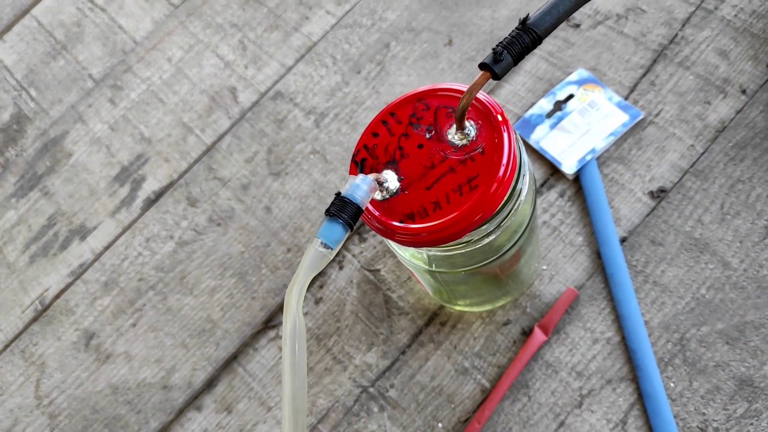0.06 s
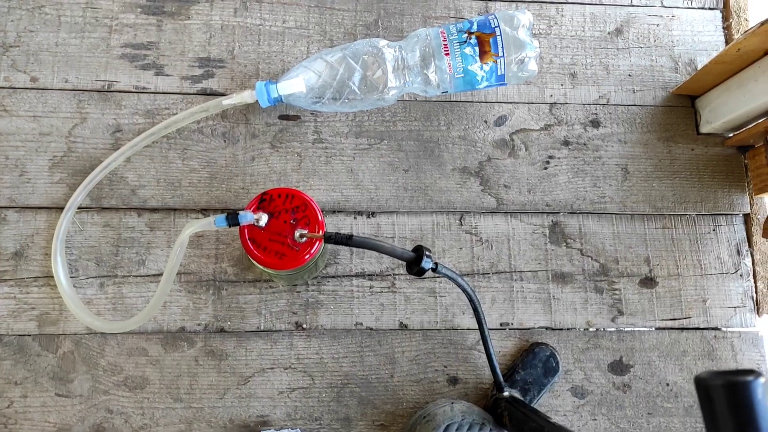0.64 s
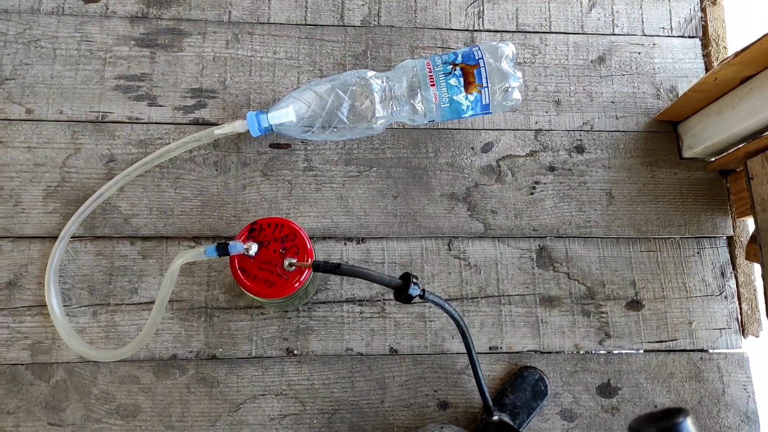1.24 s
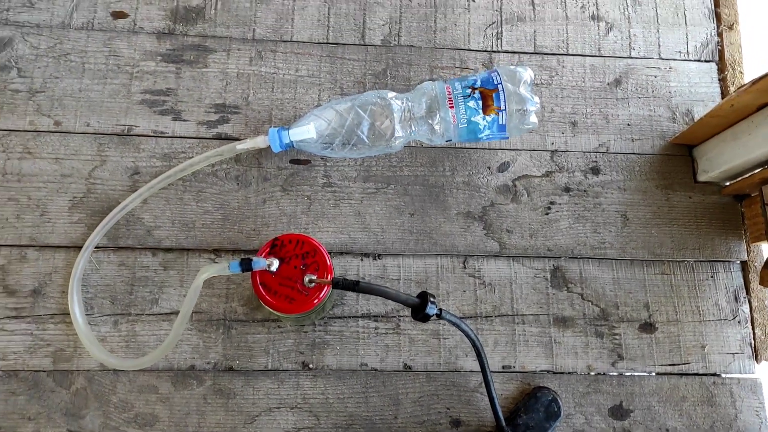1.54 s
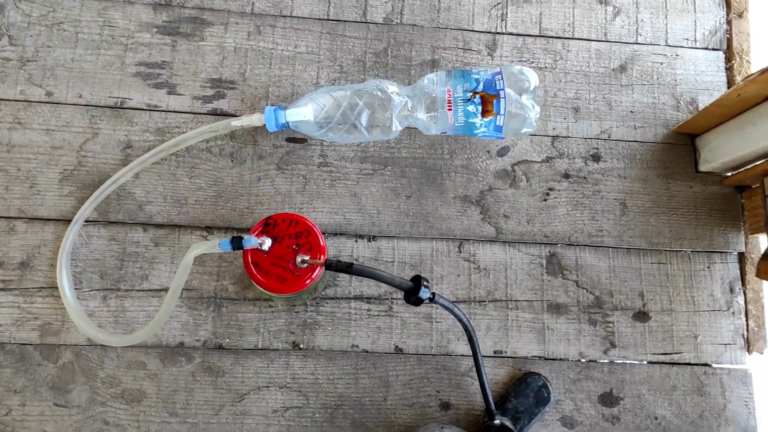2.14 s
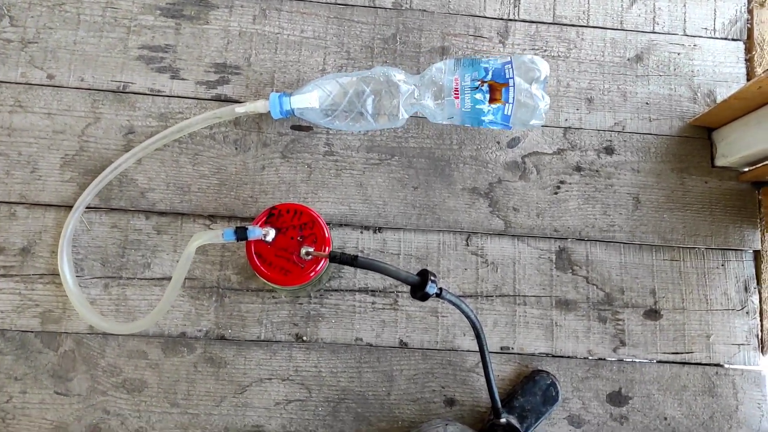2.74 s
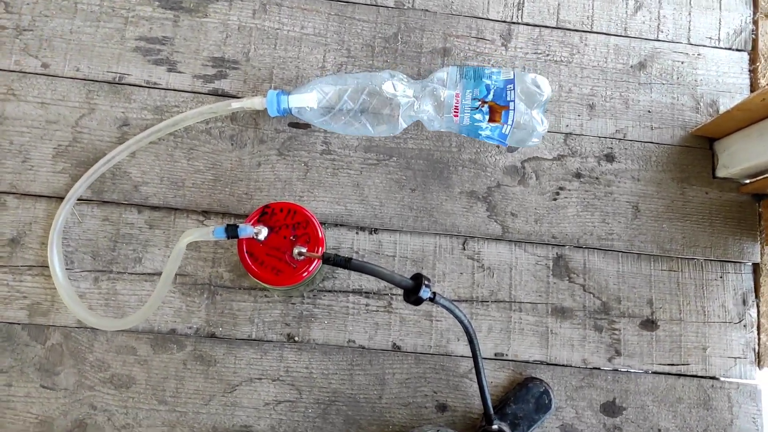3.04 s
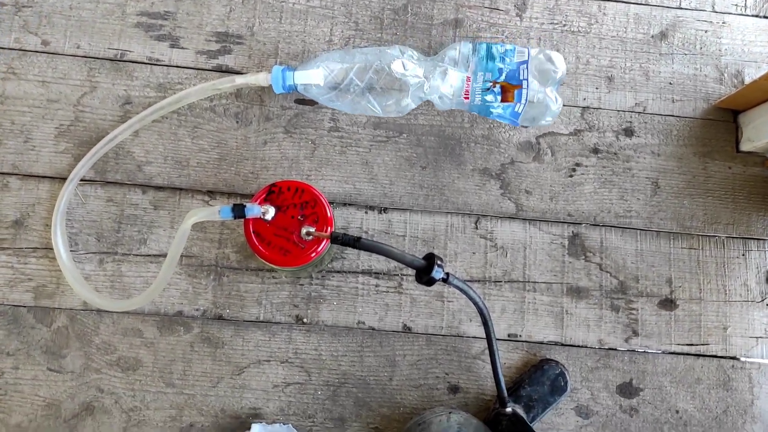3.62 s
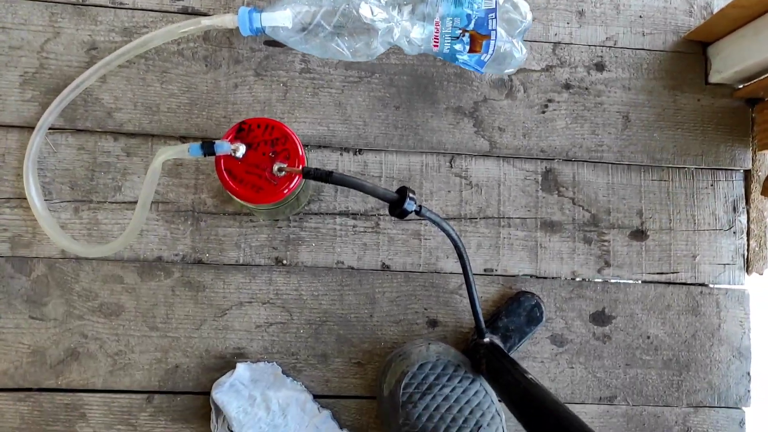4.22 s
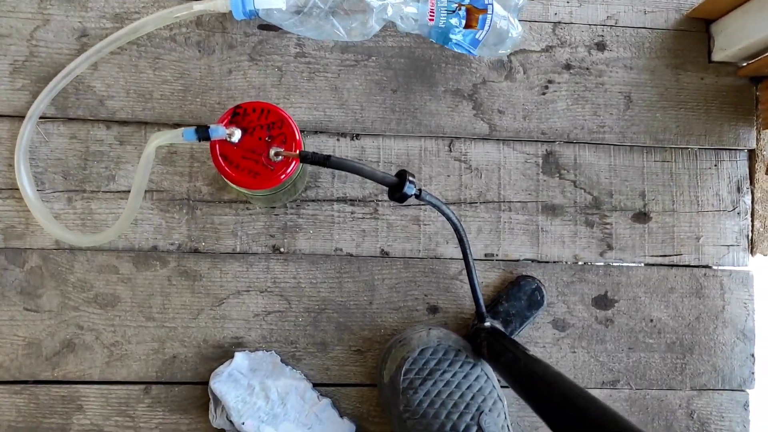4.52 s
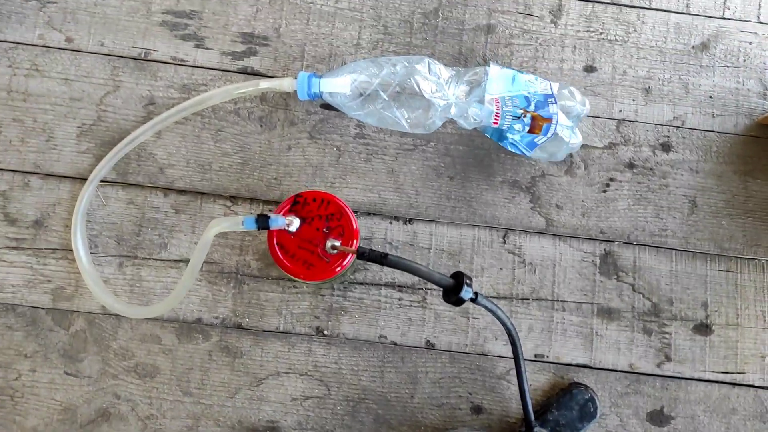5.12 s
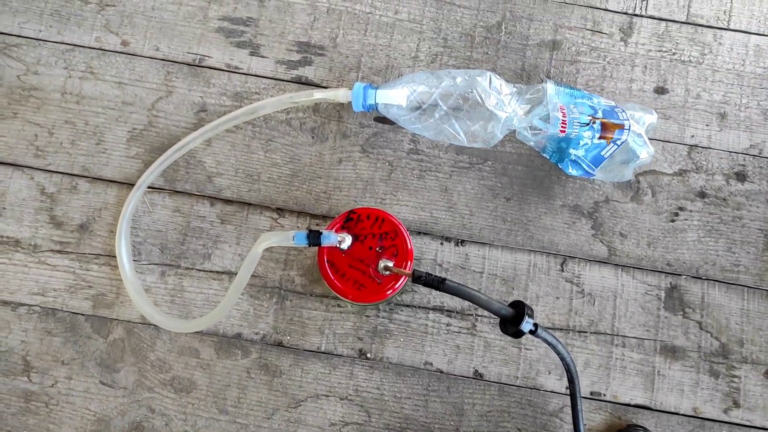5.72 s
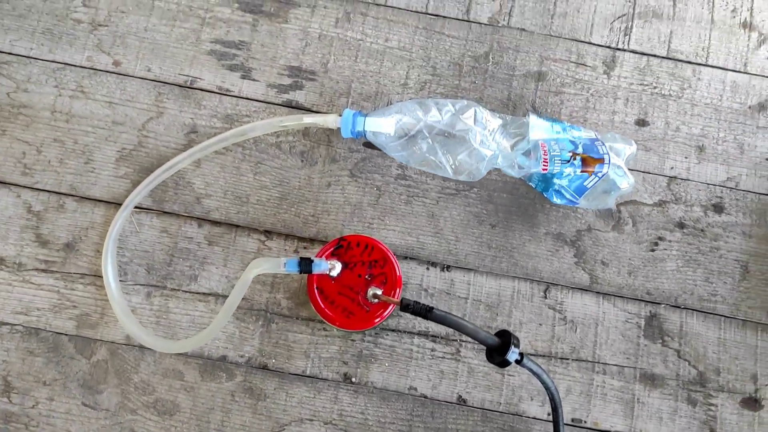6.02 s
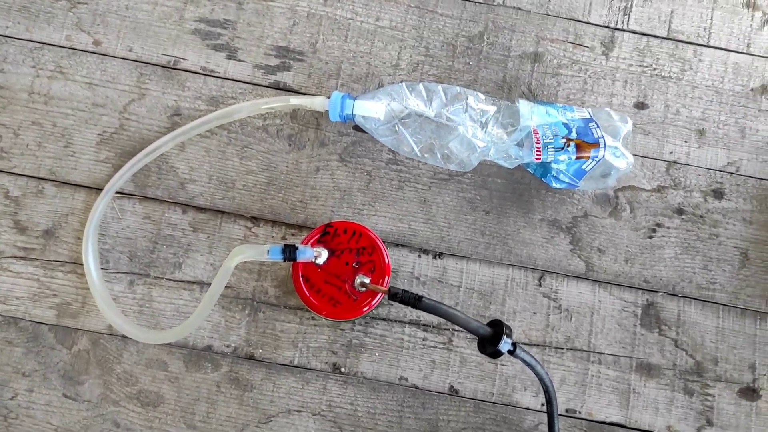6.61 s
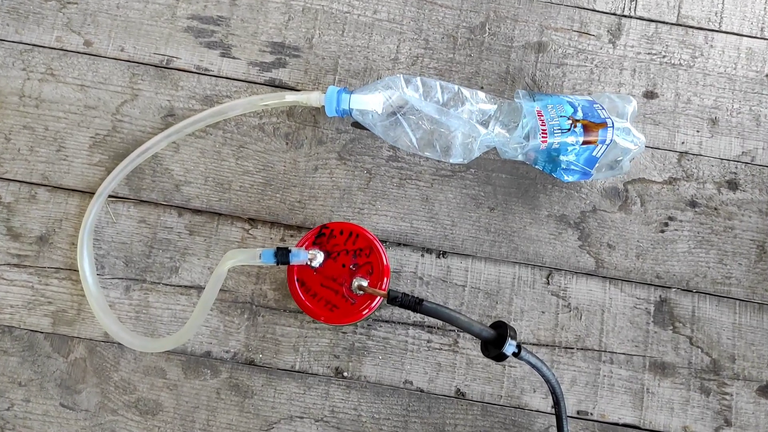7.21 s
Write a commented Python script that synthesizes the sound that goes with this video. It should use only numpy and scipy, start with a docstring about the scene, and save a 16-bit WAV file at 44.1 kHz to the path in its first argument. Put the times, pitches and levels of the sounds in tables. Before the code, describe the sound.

Hand pump strokes hiss and rub in a small workshop while an emptying plastic bottle buckles with loud, hollow cracks.

```python
"""A small workshop with a wooden floor: a foot-worked vacuum pump empties a thin plastic bottle. Faint whistles
come first. Air hisses, the piston rubs, the barrel rings, the seal squeaks once and the boards knock. The wall
buckles in volleys of pops: a crack, then the ring of the panel and a hollow thump. Heard close through two
resonant microphone ports; the loudest pops overload."""
import sys
import numpy as np
from scipy import signal
from scipy.fft import rfft, irfft, next_fast_len
from scipy.io import wavfile
from scipy.ndimage import uniform_filter1d, map_coordinates

SR = 44100
rng = np.random.default_rng(int(sys.argv[2]) if len(sys.argv) > 2 else 0)


def int16_out(signal):
    """Quantize to a 16-bit WAV file."""
    q = np.round(np.clip(np.atleast_2d(signal).T, -1, 1) * 32767)
    wavfile.write(sys.argv[1], SR, q.astype(np.int16))


N = 320166
SCENE_S = np.arange(N) / SR
EVENT_S = np.arange(SR // 2) / SR  # time within one pop or knock


def amp(db):
    """Decibels to gain."""
    return 10 ** (np.asarray(db) / 20)


def unit(x):
    """Scale to rms 1."""
    return x / np.sqrt(np.mean(x ** 2) + 1e-20)


def burst(x):
    """Scale to the energy of 10 ms at rms 1."""
    return unit(x) * np.sqrt(.01 * SR / x.shape[-1])


def along(points, hz):
    """Interpolate (freq_hz, value) points on a log axis."""
    freqs_hz, values = np.transpose(points)
    return np.interp(np.log(hz + 1), np.log(freqs_hz + 1), values)


def add(track, start_s, x):
    """Mix x into the track."""
    start = max(round(start_s * SR), 0)
    track[:, start:start + x.shape[-1]] += x[..., :N - start]


def band(x, low_hz, high_hz, order=3):
    """Causal band-pass."""
    sos = signal.butter(order, [low_hz, min(high_hz, SR / 2 - 1)], "band", fs=SR, output="sos")
    return signal.sosfilt(sos, x)


def swell(middle_s, length_s):
    """Half-cosine rise and fall, height 1."""
    return np.cos(np.pi * np.clip((SCENE_S - middle_s) / length_s, -.5, .5))


# Left-right likeness of diffuse sound: freq_hz, correlation
COHERENCE = [(100, 0.88), (400, 0.82), (950, 0.6), (2200, 0), (15000, 0)]
def diffuse(size, spectrum=((1, 0),)):
    """Stereo noise of rms 1, alike in the bass, unrelated in the treble."""
    hz = np.fft.rfftfreq(size, 1 / SR)
    angle = np.arccos(np.clip(along(COHERENCE, hz), -1, 1)) / 2
    bins = rfft(rng.standard_normal((2, size))) * amp(along(spectrum, hz))
    mid, side = irfft(bins * [np.cos(angle), np.sin(angle)], size)
    return unit(np.array([mid + side, mid - side]))


def rush(spectrum, patchy_db):
    """Noise whose colour shifts in patches."""
    bins = signal.stft(diffuse(next_fast_len(N), spectrum), nperseg=512)[2]
    patches = uniform_filter1d(rng.standard_normal(bins.shape[1:]), size=3, axis=0)
    patches = unit(uniform_filter1d(patches, size=10, axis=1))
    return unit(signal.istft(bins * amp(patchy_db * patches), nperseg=512)[1][:, :N])


# Background spectrum: freq_hz, relative_db
ROOM_TONE_SPECTRUM = [(15, -38), (25, 11.5), (150, -2.5), (231, 0), (588, -9), (673, -6.5), (1120, -10.5),
                      (1280, -15.5), (7680, -16.5), (15000, -48)]
def room_tone():
    """The workshop's faint, low background."""
    return amp(-58) * rush(ROOM_TONE_SPECTRUM, patchy_db=2)


# Thin whistles: middle_s, length_s, first_hz, last_hz, relative_db
WHISTLE_GLIDES = [(0.142, 0.034, 4850, 4540, -61.5), (0.2, .09, 3000, 3730, -64),
                  (.635, .06, 6000, 5750, -76), (0.703, 0.085, 4900, 4100, -63),
                  (0.748, 0.11, 3450, 2420, -63)]
def whistles():
    """Faint, airy tones glide up or down ahead of the first stroke."""
    air = unit(band(diffuse(N), 18, 380))
    out = np.zeros((2, N))
    for middle_s, length_s, first_hz, last_hz, relative_db in WHISTLE_GLIDES:
        hz = np.interp(SCENE_S, [middle_s - length_s / 2, middle_s + length_s / 2], [first_hz, last_hz])
        tone = np.sin(2 * np.pi * np.cumsum(hz) / SR)
        out += amp(relative_db + 11.5) * swell(middle_s, length_s) * air * tone
    return out


def fade(delay_s, rise_s, t60_s):
    """Envelope of something struck."""
    age_s = np.maximum(EVENT_S - delay_s, 0)
    return (1 - np.exp(-age_s / rise_s)) * amp(-60 * age_s / t60_s)


def ring(hz, delay_s, rise_s, t60_s, sharp=0):
    """One damped mode; it can start sharp by a fraction and drop to pitch as the wall relaxes."""
    relax_s = .003
    cycles = hz * (EVENT_S - sharp * relax_s * np.exp(-EVENT_S / relax_s))
    return burst(np.sin(2 * np.pi * (cycles + rng.random())) * fade(delay_s, rise_s, t60_s))


def crumple(low_hz, high_hz, delay_s, rise_s, t60_s):
    """Crowded, quickly damped modes of thin plastic in one band."""
    return burst(band(diffuse(len(EVENT_S)) * fade(delay_s, rise_s, t60_s), low_hz, high_hz))


# Workshop reverberation: freq_hz, t60_s
ROOM_DECAY = [(150, 0.21), (600, 0.26), (2000, 0.22), (8000, 0.22), (15000, 0.13)]
def echo(x, onset_s):
    """Room tail at the rms of x; each source spot meets other reflections."""
    size = len(EVENT_S)
    hz, time_s, bins = signal.stft(diffuse(size), SR, nperseg=256)
    decay = amp(-60 * time_s / along(ROOM_DECAY, hz)[:, None])
    tail = signal.istft(bins * decay, SR, nperseg=256)[1][:, :size]
    tail *= np.clip(EVENT_S / onset_s - .5, 0, 1)
    return unit(signal.fftconvolve(x, tail, axes=1)[:, :size]) * np.sqrt(np.mean(x ** 2))


# Modes of the whole bottle: pitch_hz, relative_db
BODY_MODES = [(165, -6.5), (224, 0), (301, -1.5), (350, -3)]
def body_thump(scatter_db=2):
    """The whole bottle hums briefly; each push is shared differently among its modes."""
    hum = sum(amp(db + rng.normal(0, scatter_db)) * ring(hz, delay_s=.0016, rise_s=.0027, t60_s=.093)
              for hz, db in BODY_MODES)
    cluster = crumple(155, 460, delay_s=.0006, rise_s=.0025, t60_s=.13)
    return burst(burst(hum) + amp(-.5) * cluster)


def buckle(snap_db, crack_db, thump_db, panel_hz):
    """One pop. Bending waves disperse: the crack leads, the panel's ring and the thump follow."""
    crack = amp(crack_db - 1) * crumple(4700, 14600, delay_s=.00031, rise_s=.0012, t60_s=.029)
    snap = amp(snap_db + 2.5) * crumple(1130, 4250, delay_s=.00038, rise_s=.0016, t60_s=.029)
    tone = ring(panel_hz, delay_s=.0015, rise_s=.0018, t60_s=.08, sharp=.4)
    cluster = crumple(483, 1290, delay_s=.00047, rise_s=.0034, t60_s=.041)
    panel = burst(band(tone + amp(-1) * cluster, 412, 3800))
    bright = crack + snap
    hollow = amp(3.5) * panel + amp(thump_db - .93) * body_thump()
    room = amp(-5.5) * echo(bright, onset_s=.008) + amp(-9) * echo(hollow, onset_s=.0077)
    return bright + hollow + room


# Wall buckles: start_s, gain_db, snap_db, crack_db, thump_db, panel_hz (part gains before trim)
BUCKLES = [(.136, -68.5, 6, 17, -2, 515), (1.361, -28, 6, 6, 5, 414), (1.463, -30.5, 9.5, 18, -2, 838),
           (1.492, -20, 3, 6, -11.5, 795), (1.559, -18, -5.5, -3, -5, 1034),
           (1.569, -20, 3.5, 14, -11, 505), (1.657, -21, 9, 15.5, -3, 994), (1.669, -13.5, 2, 6, -3, 910),
           (1.7184, -12.5, 2, 11.5, -6.5, 428), (1.728, -18.5, -14, -8, -3, 652),
           (1.822, -41, 9, -10, -20, 536), (1.913, -40, -13, 1, -3.5, 927),
           (1.945, -50.5, 0, 18.5, -12, 990), (1.992, -48.5, 0, 19, 1, 920),
           (2.09, -36, -3, -10.5, -21, 510), (2.487, -36.5, -1, -5, -2, 528),
           (2.574, -12.5, -0.5, 7, -12.5, 514), (2.649, -20, 1, -3, -6.5, 511),
           (2.6706, -18, 8, 13.5, -5, 510), (2.723, -26, 7, 13, -22, 543),
           (2.733, -17, 5.5, 11.5, -4.5, 519), (2.766, -13, -8, 4, -26, 636),
           (2.775, -14.5, 0.5, 8.5, -5.5, 792), (2.8403, -13.5, 2.5, 10, -6, 515.5),
           (2.965, -50, 14.5, 8.5, -12, 970), (3.32, -24.5, -1, -0.5, -6, 516),
           (3.36, -15, -12.5, -11, -13.5, 635), (3.3688, -10.5, -3.5, 7.5, -21.5, 830),
           (3.4329, -18.5, 2, 8.5, -8, 665), (3.46, -17.5, -5, -1, -12, 665),
           (3.578, -11.5, 3.5, 10.5, 0, 524), (3.586, -13, -12.5, -14, -8, 498),
           (3.922, -15, -5, -9, -3, 815), (3.962, -20, 0, 1.5, -26, 1098), (3.98, -10, -1.5, 5, -13.5, 707),
           (5.0124, -9, -6.5, -1.5, -30, 772), (5.2133, -35.5, 19.5, 20.5, -6, 806),
           (5.273, -29.5, -27, -8.5, -3.5, 773), (5.4, -33.5, -11, -32, -5, 396),
           (5.64, -39.5, -9, -4, -5, 770), (5.776, -24.5, -5.5, -3, -16, 794),
           (5.809, -24.5, -5, 3, -19, 1100), (5.8429, -15.5, 7, 13.5, -3.5, 551),
           (5.9298, -13.5, -0.5, 3, -3.5, 632), (6.0101, -25, 9.5, 8, -12.5, 795),
           (6.052, -26.5, -10, -23, -21, 777), (6.1063, -9.5, -2.5, 4.5, -20.5, 792),
           (6.158, -17.5, 1, 7, -29, 810), (6.257, -28, -10, -26, -9.5, 935),
           (6.5618, -15.5, 4, 11.5, -12, 963), (6.607, -30.5, 13, 4, -26, 1100),
           (6.6683, -10, 1, -0.5, -6.5, 793), (6.68, -17.5, -12, 5, -7, 773),
           (6.7411, -11, 0, 2, -11.5, 672), (6.928, -19.5, 5.5, 15.5, -11, 998),
           (7.047, -42.5, 9.5, -11, -2, 950)]
def bottle():
    """The wall gives way under suction in volleys of pops."""
    out = np.zeros((2, N))
    for start_s, gain_db, snap_db, crack_db, thump_db, panel_hz in BUCKLES:
        add(out, start_s, amp(gain_db) * buckle(snap_db, crack_db, thump_db, panel_hz))
    return out


def stroke(start_s, end_s, attack_s=.17, sag_db_per_s=18.5, release_s=.12):
    """Stroke envelope: the piston gathers speed, slows against the vacuum, stops."""
    age_s = SCENE_S - start_s
    gate = np.clip(age_s / attack_s, 0, 1) * np.clip((end_s - SCENE_S) / release_s, 0, 1)
    sag = amp(-sag_db_per_s * np.maximum(age_s - attack_s, 0))
    return np.sin(np.pi / 2 * gate) ** 2 * sag


def wobble(knots_per_s):
    """Smooth random curve."""
    knots = rng.standard_normal(int(N * knots_per_s / SR) + 4)
    return map_coordinates(knots, [SCENE_S * knots_per_s])


# Valve air and piston friction spectra: freq_hz, relative_db
HISS_SPECTRUM = [(1500, -57.5), (3500, -8.5), (5000, -4), (7000, -2.5), (9000, 0), (12000, -11.5),
                 (15000, -1)]
RUB_SPECTRUM = [(60, -23), (160, -7), (400, -11), (650, -4.5), (950, -6), (1400, -3), (2000, -8), (2900, 2),
                (3800, -9.5), (6000, -18.5)]
# Piston strokes: start_s, end_s, hiss_db, rub_db
PUMP_STROKES = [(1.157, 1.926, -35.5, -41), (1.927, 2.37, -36, -40), (2.361, 3.269, -27, -33.5),
                (3.206, 3.96, -27.5, -34.5), (4.047, 4.51, -22, -35.5), (4.405, 4.881, -33, -39),
                (4.853, 5.677, -28.5, -34), (5.633, 6.395, -24.5, -31.5), (6.364, 7.174, -24, -29),
                (7.121, 7.8, -27, -31)]
# The piston catches and slips on: middle_s, length_s, hiss_db, rub_db
PISTON_SLIPS = [(2.069, 0.14, -26.5, -29), (2.274, 0.041, -48, -47), (2.959, 0.14, -22.5, -24.5),
                (3.133, 0.08, -30.5, -34), (3.526, 0.18, -19.5, -27), (3.792, .04, -23.5, -33.5),
                (4.336, 0.17, -25, -26.5), (4.363, .045, -13.5, -23.5), (4.552, 0.16, -26.5, -31),
                (4.755, 0.054, -34, -37), (5.161, 0.11, -22.5, -23), (5.389, 0.06, -27.5, -29.5),
                (5.488, 0.077, -27.5, -34), (5.566, 0.045, -35, -38.5), (6.892, 0.078, -28, -26),
                (7.05, 0.046, -32, -33)]
def pump(barrel_hz=940, barrel_width_hz=45, hiss_flutter_db=1, rub_flutter_db=2.5):
    """Air hisses through the valve while the piston rubs along the ringing barrel."""
    steady = np.clip((SCENE_S - .59) / .29, 0, 1)  # faint hiss fades in before the pumping starts
    moves = [(steady, -50.5, -58)]  # envelope, hiss_db, rub_db
    moves += [(stroke(start_s, end_s), *levels_db) for start_s, end_s, *levels_db in PUMP_STROKES]
    moves += [(swell(middle_s, length_s), *levels_db) for middle_s, length_s, *levels_db in PISTON_SLIPS]
    flow = np.sqrt(sum((amp(hiss_db) * shape) ** 2 for shape, hiss_db, _ in moves))
    friction = np.sqrt(sum((amp(rub_db) * np.abs(shape) ** .98) ** 2 for shape, _, rub_db in moves))
    flutter = wobble(knots_per_s=45)  # uneven sliding
    hiss = flow * amp(hiss_flutter_db * flutter) * rush(HISS_SPECTRUM, patchy_db=5)
    barrel = band(diffuse(N), barrel_hz - barrel_width_hz / 2, barrel_hz + barrel_width_hz / 2, order=1)
    rub = rush(RUB_SPECTRUM, patchy_db=5) + amp(-10) * unit(barrel)
    return hiss + friction * amp(rub_flutter_db * flutter) * rub


# Floor knocks: start_s, level_db, pitch_hz
FLOOR_KNOCKS = [(1.746, -29, 146), (1.776, -26, 157), (4.389, -33.5, 170), (4.407, -21.5, 150),
                (6.266, -36, 251)]
def floorboards():
    """The boards give under the pump with a soft, low knock."""
    out = np.zeros((2, N))
    for start_s, level_db, pitch_hz in FLOOR_KNOCKS:
        knock = amp(level_db) * ring(pitch_hz, delay_s=0, rise_s=.0064, t60_s=.083)[None]
        add(out, start_s, knock + amp(-12.5) * echo(knock, onset_s=.029))
    return out


# Brief narrow tones, the pump barrel ringing near 950 Hz and one seal squeak at 1.4 kHz: middle_s, length_s,
# pitch_hz, level_db
BARREL_RINGS_AND_SQUEAK = [(2.953, 0.066, 993, -39), (3.076, 0.061, 910, -40), (3.158, 0.15, 780, -42),
                           (4.287, 0.045, 1422, -23), (6.267, .05, 947, -27)]
def barrel_and_seal(half_width_hz=33):
    """The pump barrel rings briefly in a narrow band; once the seal squeaks."""
    out = np.zeros((2, N))
    for middle_s, length_s, pitch_hz, level_db in BARREL_RINGS_AND_SQUEAK:
        squeak = unit(band(diffuse(N), pitch_hz - half_width_hz, pitch_hz + half_width_hz, order=2))
        out += amp(level_db) * swell(middle_s, length_s) * squeak
    return out


def scene():
    """Floor, pump and bottle over the quiet of the workshop."""
    return room_tone() + floorboards() + pump() + barrel_and_seal() + whistles() + bottle()


def coloured(x, points, size=4096):
    """Minimum-phase filter through (freq_hz, gain_db) points."""
    gain = amp(along(points, np.fft.rfftfreq(size, 1 / SR)))
    cepstrum = irfft(np.log(gain))
    cepstrum[1:size // 2] *= 2
    cepstrum[size // 2 + 1:] = 0
    impulse = irfft(np.exp(rfft(cepstrum)))
    return signal.fftconvolve(x, impulse)[:N]


# Microphone port response: freq_hz, left_db, right_db
PORT_RESPONSE = [(199, 1.5, -3), (490, -0.5, -2.5), (1110, -4, -4), (1920, -3.5, 2.5), (2710, -7, -5),
                 (3560, -11, -9.5), (4770, -8, -6), (6600, -9, -3), (7320, -1.5, 2.5), (8470, 1.5, -3),
                 (8984, 1, -8), (9890, -17, -17), (12100, -19.5, -22), (14760, -27, -26.5)]
def record(dry):
    """Each port has its own treble resonance; peaks flatten at full scale; the band is limited."""
    ports, top_hz = np.array(PORT_RESPONSE), 15700
    heard = np.array([coloured(dry[side], ports[:, [0, side + 1]]) for side in range(2)])
    flattened = heard / (1 + np.abs(heard) ** 6) ** (1 / 6)
    return irfft(rfft(flattened) * (np.fft.rfftfreq(N, 1 / SR) < top_hz), N)


dry = scene()
out = record(dry)
int16_out(out)
```